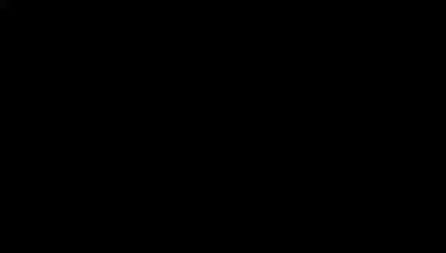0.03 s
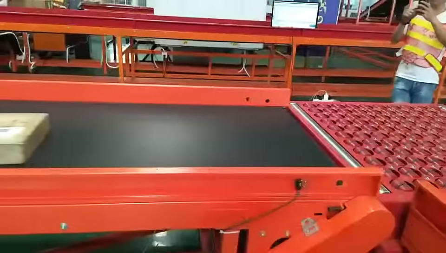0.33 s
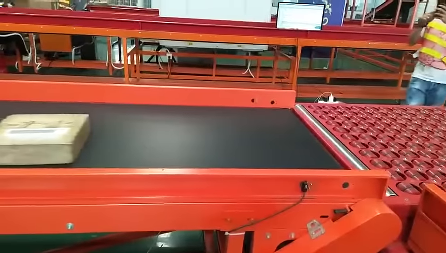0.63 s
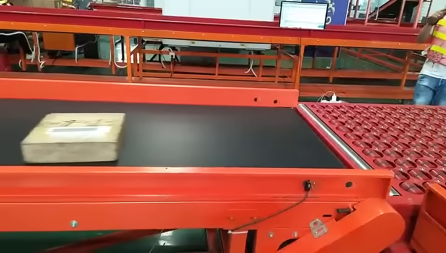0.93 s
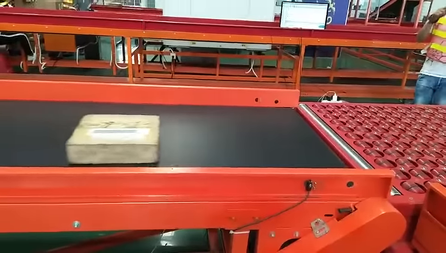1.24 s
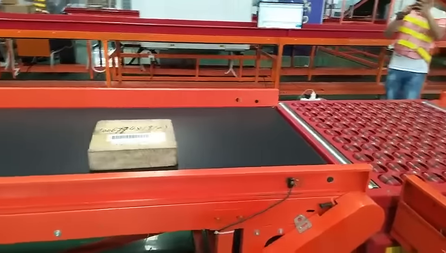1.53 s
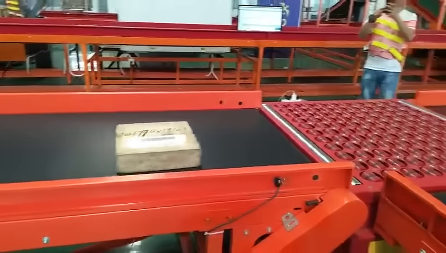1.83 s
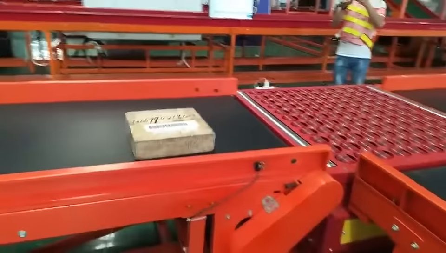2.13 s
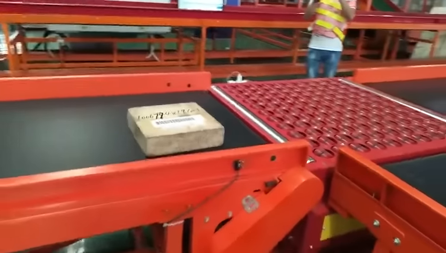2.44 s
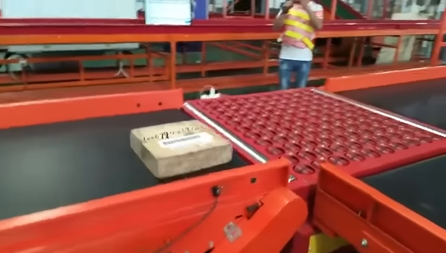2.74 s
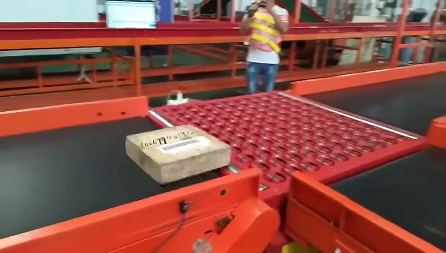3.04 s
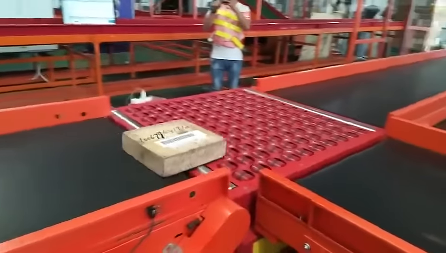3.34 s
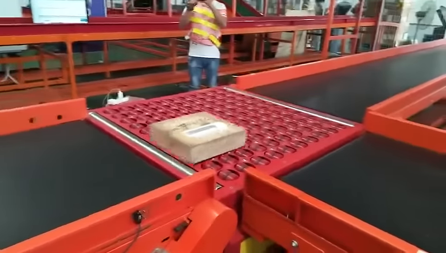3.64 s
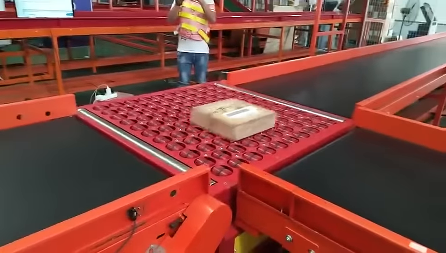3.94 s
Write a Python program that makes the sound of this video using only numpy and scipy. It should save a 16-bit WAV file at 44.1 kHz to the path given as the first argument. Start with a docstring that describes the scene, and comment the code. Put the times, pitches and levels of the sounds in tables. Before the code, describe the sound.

Close to the microphone, a conveyor runs with a shrill, pulsing whine and light clicks. It winds down, sorter rollers whir up, and a box lands with a knock and metallic ring over the drone of a warehouse.

```python
"""A belt conveyor carrying a parcel through a warehouse, the microphone close beside its frame.
The toothed drive hums and whines, its roughness repeating on every lap, then stops; small parts click
and squeak. The roller sorter starts with a rougher whine and the parcel knocks onto it, ringing the
steel. Farther off in the hall, other machines and motors drone throughout."""
import sys
import numpy as np
from scipy import signal
from scipy.fft import rfft, irfft
from scipy.io import wavfile
from scipy.ndimage import uniform_filter1d, map_coordinates

SR = 44100
rng = np.random.default_rng(int(sys.argv[2]) if len(sys.argv) > 2 else 0)


def wav_out(sig):
    """Save sig, one row per channel (or a flat mono array), as 16-bit PCM at SR to the path in sys.argv[1]."""
    wavfile.write(sys.argv[1], SR, np.round(np.clip(np.atleast_2d(sig).T, -1, 1) * 32767).astype(np.int16))


N = 176400

# low tones of the drive: pitch_hz, level_db
HUM_TONES = [(421, -42), (630, -33.5), (841, -49.5)]
# high tones of the drive: pitch_hz, level_db
WHINE_TONES = [(1251, -38), (1690, -44), (1760, -45), (1846, -42.5), (1900, -41.5), (5040, -52.5),
               (6089, -54.5)]
# course of the fourth mesh harmonic, the strongest whine: time_s, level_db
SHRILL_LEVELS = [(0.25, -27.5), (0.52, -29), (0.66, -25.5), (0.86, -31), (0.98, -24.5), (1.05, -25),
                 (1.15, -30), (1.3, -25.5), (1.39, -25), (1.49, -30.5), (1.58, -27), (1.88, -33),
                 (1.97, -29), (2.2, -36), (2.35, -28), (2.5, -34), (2.69, -25.5), (2.76, -30), (2.8, -25.5)]
# frame resonances: pitch_hz, width_hz, gain_db
FRAME_MODES = [(450, 88, -18), (1297, 57, -2), (1709, 98, -1), (1860, 70, -1.5), (2499, 102, -0.5),
               (3080, 28, -5), (3800, 160, -13)]
# rough places that chirp once a lap: time_s, pitch_hz, half_length_s, level_db
LAP_CHIRPS = [(0.2607, 1285, .009, -24.5), (.348, 1305, 0.0083, -36.5), (.381, 1270, 0.008, -31),
              (.463, 1310, .007, -34), (.495, 1275, 0.0091, -30.5), (.58, 1262, 0.021, -33.5),
              (.279, 1910, 0.0088, -33), (.415, 1882, .011, -28), (.51, 1915, .007, -33),
              (0.278, 3830, .015, -45)]
# belt sliding on its bed: frequency_hz, gain_db
RUB_COLOUR = [(30, -38), (70, -25), (250, 0.5), (520, -11), (750, -8), (1050, -8), (1500, -0.5), (2200, -1),
              (3000, -17.5), (5000, -10.5), (8000, -27), (10500, -21.5), (12500, -73)]
# machinery across the hall: frequency_hz, gain_db
HALL_COLOUR = [(15, -59), (25, -26), (42, -22), (60, -10.5), (91, -3), (177, -3.5), (250, -0.5), (335, -1),
               (436, -3.5), (632, -5.5), (684, -4.5), (966, -2), (1550, -7), (1780, -5), (2500, -8),
               (2710, -8), (3630, -14), (6000, -18.5), (8470, -32), (10700, -27), (14000, -54)]
# distant motors: pitch_hz, width_hz, level_db
MOTOR_DRONES = [(953, 30, -45.5), (403, 67, -45), (240, 74, -50.5), (151, 38, -52), (1797, 82, -45),
                (2733, 34, -49)]
# clicks of loose parts: start_s, level_db, echo_t60_s
PART_CLICKS = [(1.753, -36.5, 0.3), (1.784, -34, 0.12), (1.793, -32.5, 0.16), (1.832, -32, 0.2),
               (1.878, -33.5, .12), (1.925, -28.5, 0.18), (2.772, -39, .15), (2.819, -31.5, 0.18),
               (2.827, -32, 0.25), (2.962, -38, 0.14), (3.007, -32.5, .15), (3.056, -31, 0.17),
               (3.42, -37.5, 0.093), (3.734, -35.5, 0.26)]
# a click's direct tick at the microphone: frequency_hz, gain_db
TICK_COLOUR = [(500, -25), (2500, -12), (5000, 7), (8000, -13), (11000, -1), (14000, -13)]
# its echo from the hall: frequency_hz, gain_db
ECHO_COLOUR = [(60, -30), (400, -22), (1500, -0.5), (3500, 7), (6000, 4), (8000, -11.5), (10500, -3.5),
               (14000, -49)]
# squeaks of small parts: centre_s, pitch_hz, half_length_s, level_db
PART_SQUEAKS = [(2.748, 5410, 0.0062, -29), (3.971, 5640, 0.0074, -30.5)]
# rough whine of the rollers: pitch_hz, width_hz, level_db
ROLLER_BANDS = [(1040, 110, -40), (1625, 190, -35), (2155, 62, -39), (2640, 220, -42.5)]
# tones of the roller motors: pitch_hz, waver_hz, level_db
ROLLER_MOTORS = [(1052, 18, -39.5), (1596, 18, -34.5)]
# the parcel lands and rattles: start_s, box_db, clatter_db, contact_cutoff_hz
PARCEL_KNOCKS = [(3.4941, -20, -45, 300), (3.4976, -11, -28, 450), (3.5002, -12.5, -22, 800),
                 (3.5107, -23, -22, 2000), (3.5233, -26, -28, 1000), (3.5331, -16, -31, 1000),
                 (3.5542, -28, -32, 1000), (3.583, -30, -33, 1500)]
# modes of the box: pitch_hz, level_db, t60_s
BOX_MODES = [(345, -2, 0.026), (425, -1.5, 0.032), (560, -9, .03), (723, -11, 0.06), (863, -7, 0.08)]
# modes of the steel deck: pitch_hz, level_db, t60_s
DECK_MODES = [(1590, -4, .2), (1880, -4, 1), (2165, -4, 0.71), (2460, 1, 0.1), (2573, -1.5, 0.77),
              (2850, -3, 0.2), (3068, -3, 0.23)]
# clatter on the rollers: frequency_hz, gain_db
ROLLER_CLATTER = [(60, -32), (200, -18), (400, 0), (850, 10), (1200, -2), (2600, -4.5), (4000, -1.5),
                  (6300, -9), (8000, -18.5), (11000, -19), (14000, -42)]

MESH_HZ, TEETH = 630, 216
LAP_S = TEETH / MESH_HZ
DRIVE_STOP_S, SHRILL_STOP_S = 2.82, 2.808
SORTER_START_S, SORTER_RISE_S, SORTER_FADE_DB_PER_S = 3.225, 0.04, 4
SPIN_UP_S, SPIN_FLAT_SHARE, SPIN_SURGE_DB = 0.0556, 0.0385, 3.5
TIME = np.arange(N) / SR


def undb(db):
    """Decibels to amplitude."""
    return 10 ** (np.asarray(db) / 20)


def unit(x):
    """Scale to rms 1."""
    return x / np.sqrt(np.mean(x ** 2))


def walk(rate_hz):
    """Smooth random wander with a spread near 1."""
    hold = int(SR / rate_hz)
    steps = np.repeat(rng.standard_normal(N // hold + 1), hold)
    return 1.67 * uniform_filter1d(uniform_filter1d(steps, hold), hold)[:N]


def lap_wobble():
    """A smooth random pattern that comes round with every lap; spread 1."""
    turn = 2 * np.pi * TIME / LAP_S
    phases = rng.uniform(0, 2 * np.pi, 14)
    return unit(sum(np.cos(k * turn + phase) for k, phase in enumerate(phases, 2)))


def each_lap(centre_s, half_s):
    """Bell-shaped envelope that comes round with every lap."""
    offset_s = (TIME - centre_s + LAP_S / 2) % LAP_S - LAP_S / 2
    return np.exp(-(offset_s / half_s) ** 2)


def in_step(hz):
    """The nearest pitch that fits a whole number of cycles into a lap."""
    return round(hz * LAP_S) / LAP_S


def noise(colour):
    """Noise of a given colour, rms 1."""
    hz, db = np.array(colour, float).T
    gains = undb(np.interp(np.log(np.fft.rfftfreq(N, 1 / SR) + 1), np.log(hz), db))
    return unit(irfft(rfft(rng.standard_normal(N)) * gains, N))


def resonate(x, hz, width_hz):
    """Steep resonance (two in a row), gain 1 at the centre."""
    b, a = signal.iirpeak(hz, hz / (1.5 * width_hz), fs=SR)
    return signal.lfilter(b, a, signal.lfilter(b, a, x))


def noise_band(hz, width_hz):
    """Noise around one pitch, rms 1."""
    return unit(resonate(rng.standard_normal(N), hz, width_hz))


def fall(start_s, t60_s):
    """1 until the start, then an exponential decay."""
    return np.exp(-np.log(1000) * np.clip((TIME - start_s) / t60_s, 0, 2))


def rise(start_s, rise_s):
    """Straight ramp from 0 to 1."""
    return np.clip((TIME - start_s) / rise_s, 0, 1)


def burst(start_s, t60_s):
    """Quick rise and exponential decay."""
    return rise(start_s, 0.0013) * fall(start_s, t60_s)


def swell(centre_s, half_s):
    """Bell-shaped envelope."""
    return np.exp(-np.minimum(((TIME - centre_s) / half_s) ** 2, 20))


def tone(hz):
    """Sine of rms 1."""
    return np.sqrt(2) * np.sin(2 * np.pi * (hz * TIME + rng.random()))


def drive_tone(hz, wobble_db, flutter_db=0.5, flutter_hz=25.35):
    """A tone whose level wobbles with the lap and flutters at random; rms 1."""
    return unit(tone(hz) * undb(wobble_db * lap_wobble() + flutter_db * walk(flutter_hz)))


def drive_hum():
    """The drive's low hum, dipping briefly once a lap."""
    hum = sum(undb(db) * drive_tone(hz, wobble_db=0.8) for hz, db in HUM_TONES)
    return hum * undb(-8 * each_lap(0.534, half_s=0.014))


def mesh_shrill():
    """The fourth harmonic of the meshing teeth, swelling and sinking."""
    level_db = np.interp(TIME, *np.array(SHRILL_LEVELS).T) - 0.4
    return drive_tone(4 * MESH_HZ, wobble_db=0.7, flutter_db=1, flutter_hz=70) * undb(level_db)


def teeth():
    """Uneven teeth strike and shake the frame, in the same pattern every lap."""
    strikes = rng.standard_normal(N) * (np.arange(N) % (SR // MESH_HZ) == 0)
    strikes = np.resize(strikes[:round(SR * LAP_S)], N)
    frame = sum(undb(db) * resonate(strikes, hz, width) for hz, width, db in FRAME_MODES)
    return undb(-33.5) * unit(frame)


def belt():
    """The belt rubs on its bed; once a lap its rough places chirp and its seam scuffs."""
    chirps = sum(undb(db) * tone(in_step(hz)) * each_lap(at, half) for at, hz, half, db in LAP_CHIRPS)
    scuff = noise_band(6700, width_hz=2200) * each_lap(0.378, half_s=0.018)
    scuff *= undb(-44 - 2 * TIME)  # fainter as the microphone moves on
    rub = noise(RUB_COLOUR) * undb(-36 + 0.52 * lap_wobble())
    return chirps + scuff + rub


def conveyor():
    """Drive and belt, close by; at the stop the shrill tone dies first and the hum last."""
    hum = drive_hum() * fall(DRIVE_STOP_S, t60_s=0.89)
    whine = sum(undb(db) * drive_tone(in_step(hz), wobble_db=1.2) for hz, db in WHINE_TONES)
    shrill = mesh_shrill() * fall(SHRILL_STOP_S, t60_s=0.13)
    running = (whine + teeth() + belt()) * fall(DRIVE_STOP_S, t60_s=0.43)
    return running + hum + shrill


def hall(octaves=10, flicker_db=0.7, swell_db=0.25, mains_hz=99.2):
    """Distant machines: octave bands that swell together and flicker alone, over mains hum."""
    spectrum = rfft(noise(HALL_COLOUR))
    octave = np.clip(np.log2((np.fft.rfftfreq(N, 1 / SR) + 1) / 30), 0, octaves - 1)
    machines = 0
    for k in range(octaves):
        band = irfft(spectrum * np.maximum(1 - abs(octave - k), 0), N)
        bass_weight = 2.5 - k / octaves
        machines += band * undb(flicker_db * bass_weight * walk(18))
    return machines * undb(-31.5 + swell_db * walk(1.4)) + undb(-53.5) * tone(mains_hz)


def distant_motors():
    """Motors far down the hall hold a few wavering pitches."""
    return sum(undb(db) * noise_band(hz, width) for hz, width, db in MOTOR_DRONES)


def clicks():
    """Loose parts click: a crisp, grainy tick, smeared by the hall's echo."""
    echo_level = np.sqrt(sum((undb(db) * burst(at, t60)) ** 2 for at, db, t60 in PART_CLICKS))
    tick_level = sum(undb(db - 7) * burst(at, t60_s=0.043) for at, db, _ in PART_CLICKS)
    echoes = noise(ECHO_COLOUR) * echo_level
    ticks = noise(TICK_COLOUR) * tick_level
    grain = unit(undb(3 * walk(rate_hz=1500)))
    return echoes + ticks * grain


def squeaks():
    """Two brief squeaks, each a narrow band and its octave; the lower band echoes."""
    sound = np.zeros(N)
    for at, hz, half, db in PART_SQUEAKS:
        low, octave = (noise_band(k * hz, width_hz=450) for k in (1, 2))
        direct = swell(at, half) * (low + undb(-10) * octave)
        echo = undb(-8) * burst(at + half, t60_s=0.18) * low
        sound += undb(db) * (direct + echo)
    return sound


def roller_tone(hz, waver_hz, flutter_db=1.8):
    """A roller's tone, wandering in pitch and fluttering in level; rms 1."""
    phase = 2 * np.pi * np.cumsum(hz + waver_hz * walk(60)) / SR
    return unit(np.sin(phase) * undb(flutter_db * walk(40)))


def sorter():
    """Many small rollers at slightly different speeds start flat and surge as they spin up."""
    age_s = np.maximum(TIME - SORTER_START_S, 0)
    rollers = sum(undb(db) * noise_band(hz, width) for hz, width, db in ROLLER_BANDS)
    motors = sum(undb(db) * roller_tone(hz, waver) for hz, waver, db in ROLLER_MOTORS)
    # a shrinking time shift lowers the pitch until the rollers reach speed
    shift_s = SPIN_FLAT_SHARE * SPIN_UP_S * np.exp(-age_s / SPIN_UP_S)
    whine = map_coordinates(rollers + motors, [(TIME + shift_s) * SR], mode="mirror")
    surge_db = SPIN_SURGE_DB * swell(SORTER_START_S + SPIN_UP_S, SPIN_UP_S / 2)
    return whine * rise(SORTER_START_S, SORTER_RISE_S) * undb(surge_db - SORTER_FADE_DB_PER_S * age_s)


def singing_rollers(start_s=3.49, rise_s=0.06):
    """The rollers sing as the parcel rides onto them."""
    envelope = rise(start_s, rise_s) * fall(start_s + rise_s, t60_s=1.3)
    return undb(-29.5) * roller_tone(2171, waver_hz=6) * envelope


def ring(modes, start_s, scatter=0.00404):
    """Struck, decaying modes, slightly detuned from blow to blow."""
    t = np.arange(SR) / SR
    ringing = np.zeros(SR)
    for hz, db, t60 in modes:
        detuned_hz = hz * (1 + scatter * rng.standard_normal())
        ringing += undb(db) * np.sin(2 * np.pi * detuned_hz * t) * np.exp(-np.log(1000) * t / t60)
    return np.pad(ringing, (int(start_s * SR), N))[:N]


def parcel(low_cut_hz=274):
    """Each blow thuds in the box, clatters on the rollers and rings the deck; thud and ring are low-cut."""
    clatter_power = sum((undb(db) * burst(at, t60_s=0.14)) ** 2 for at, _, db, _ in PARCEL_KNOCKS)
    clatter = noise(ROLLER_CLATTER) * np.sqrt(clatter_power)
    rings = np.zeros(N)
    for at, box_db, clatter_db, cutoff_hz in PARCEL_KNOCKS:
        soft_contact = signal.butter(2, cutoff_hz, fs=SR, output="sos")
        thud = signal.sosfilt(soft_contact, ring(BOX_MODES, at))
        rings += undb(box_db) * thud + undb(clatter_db - 6) * ring(DECK_MODES, at)
    low_cut = signal.butter(3, low_cut_hz, "high", fs=SR, output="sos")
    return clatter + signal.sosfilt(low_cut, rings)


def scene():
    """The warehouse in mono, from beside the conveyor's frame."""
    machinery = conveyor() + hall() + distant_motors()
    return (machinery + clicks() + squeaks() + sorter() + singing_rollers() + parcel())[None]


def record(dry, top_hz=14200):
    """The microphone's signal fades in from silence; the top is cut steeply."""
    fade = np.interp(TIME, [0.084, 0.182, 0.28], undb([-15, -6.5, 0]), left=0)
    high_cut = signal.ellip(8, 0.2, 70, top_hz, fs=SR, output="sos")
    return signal.sosfilt(high_cut, dry * fade)


dry = scene()
out = record(dry)
wav_out(out)
```